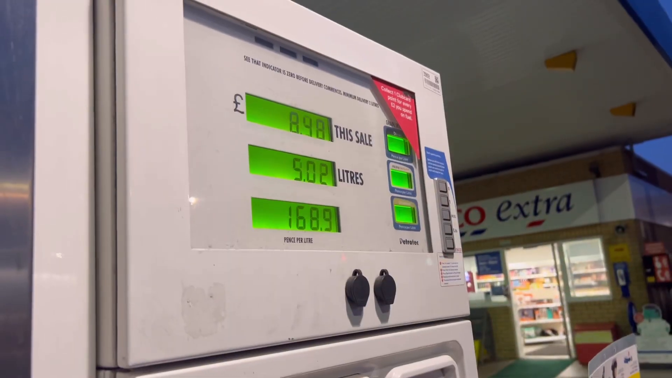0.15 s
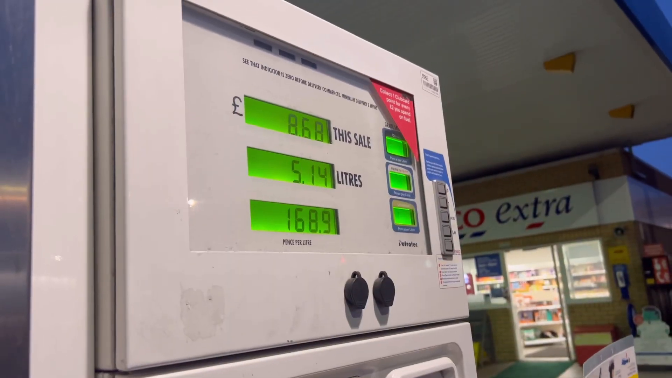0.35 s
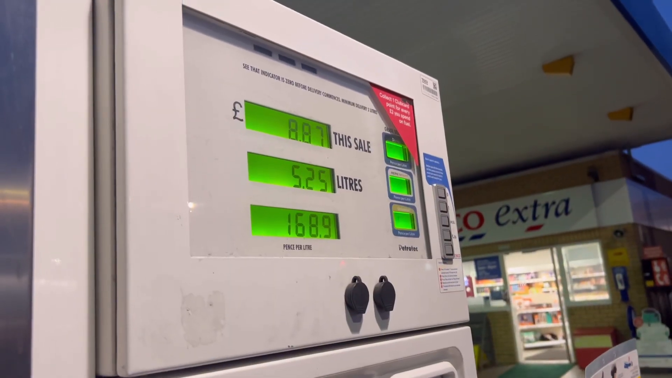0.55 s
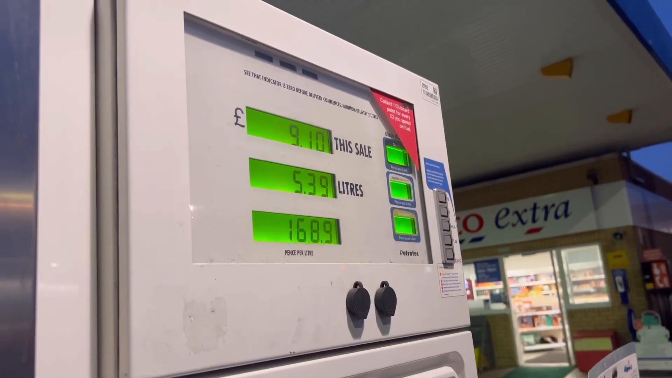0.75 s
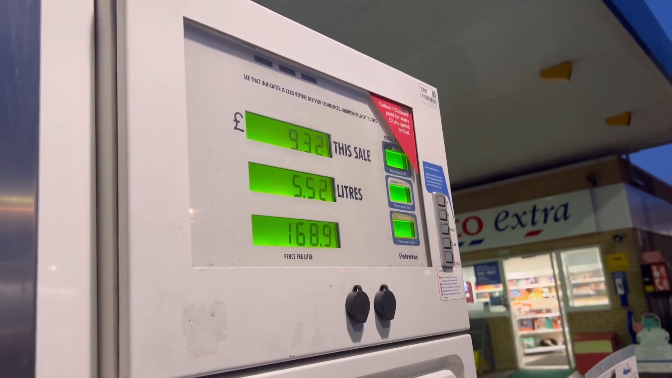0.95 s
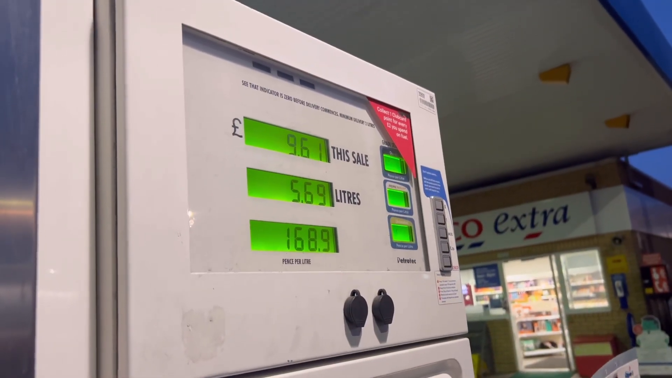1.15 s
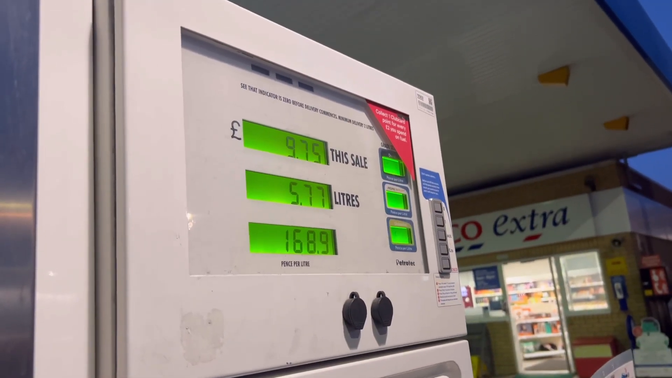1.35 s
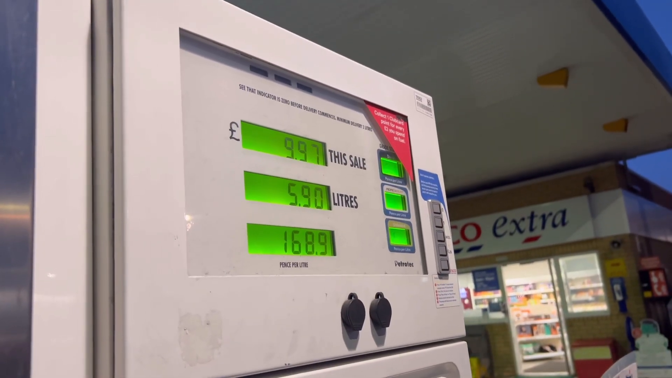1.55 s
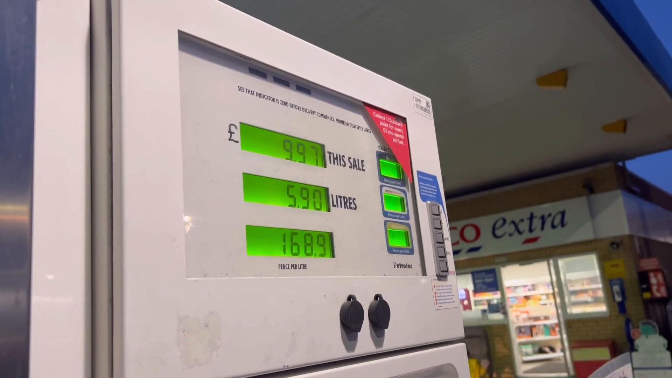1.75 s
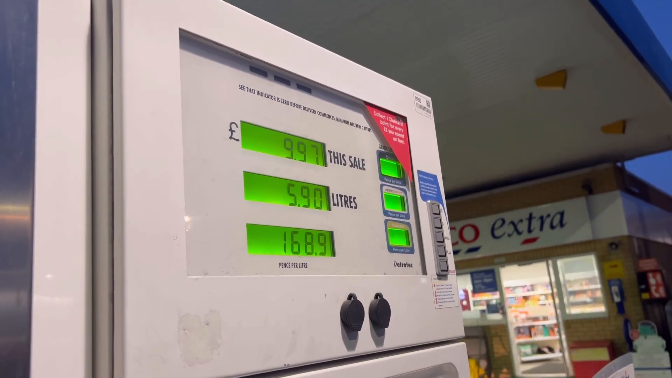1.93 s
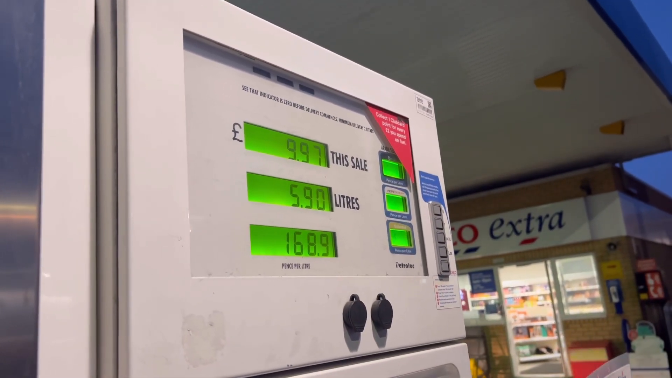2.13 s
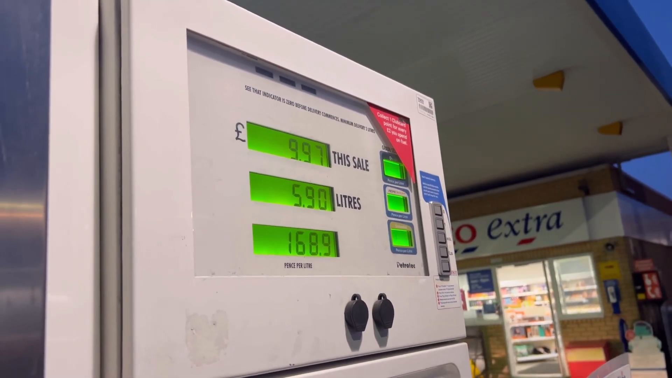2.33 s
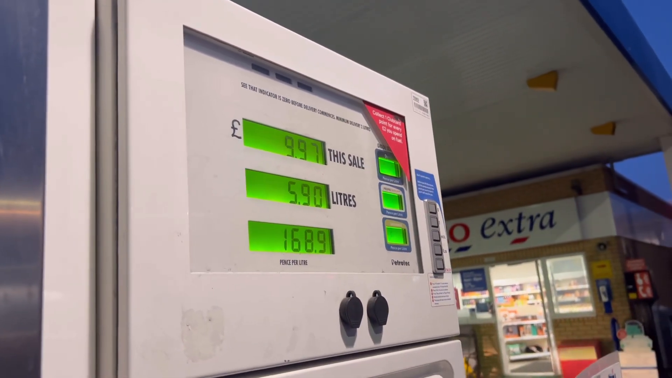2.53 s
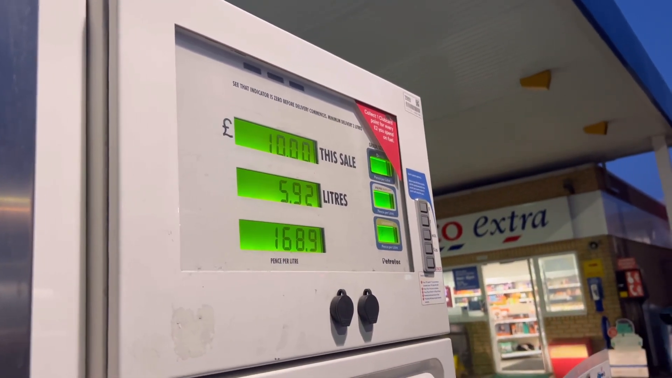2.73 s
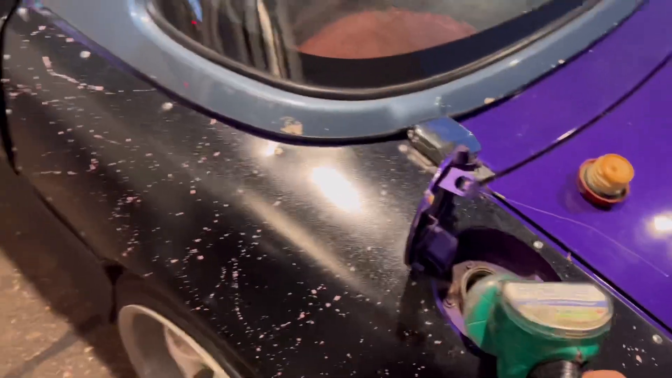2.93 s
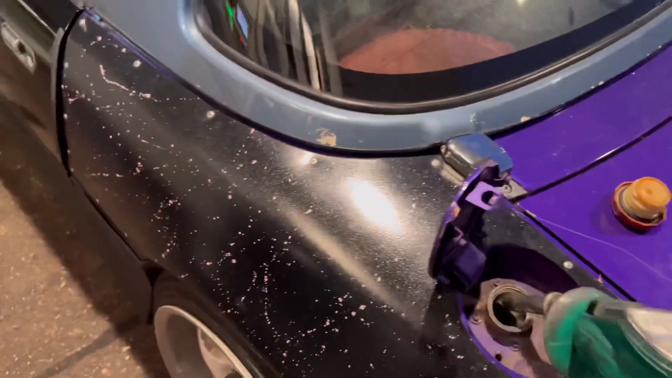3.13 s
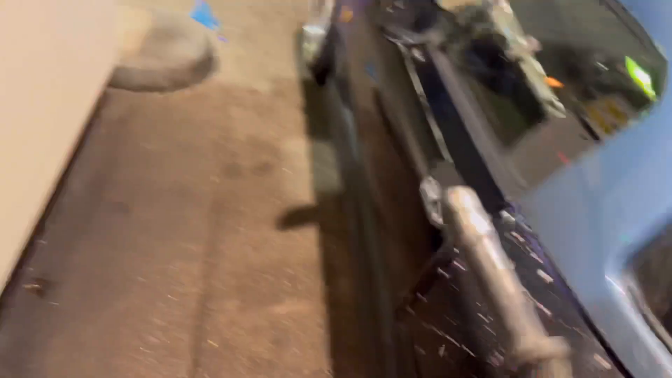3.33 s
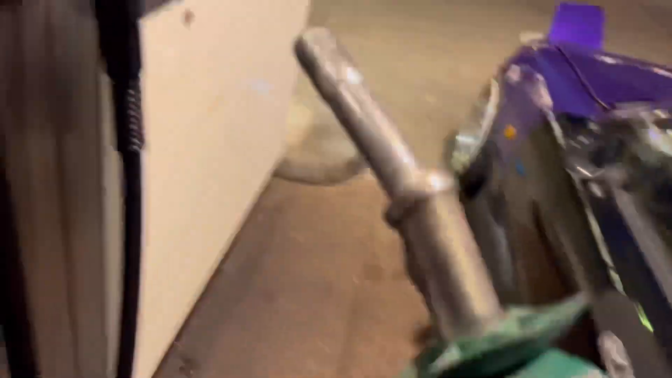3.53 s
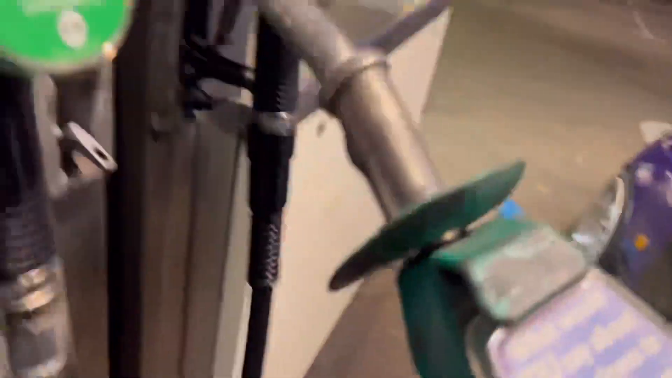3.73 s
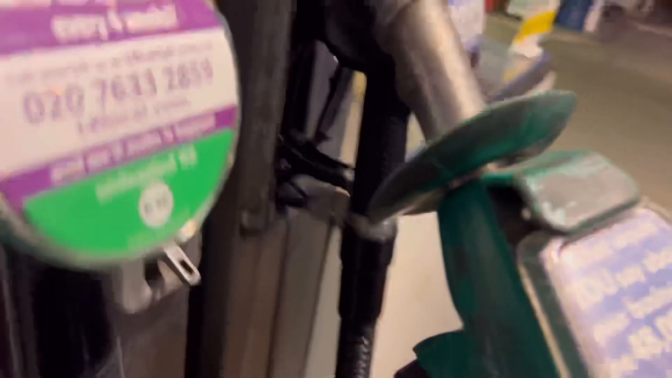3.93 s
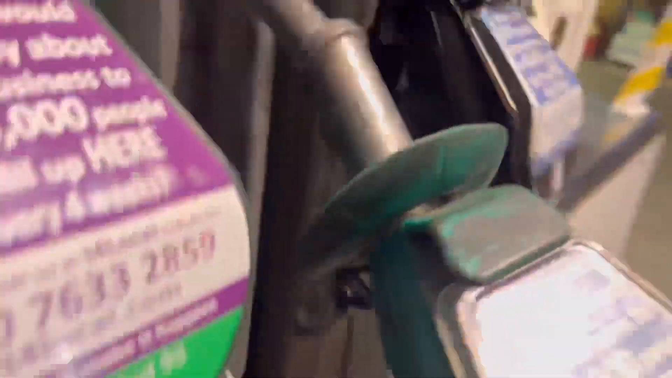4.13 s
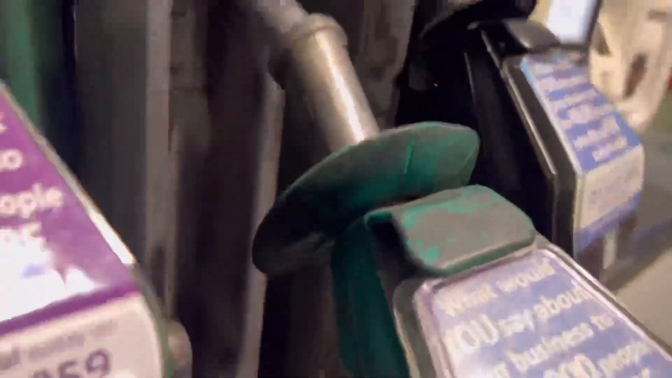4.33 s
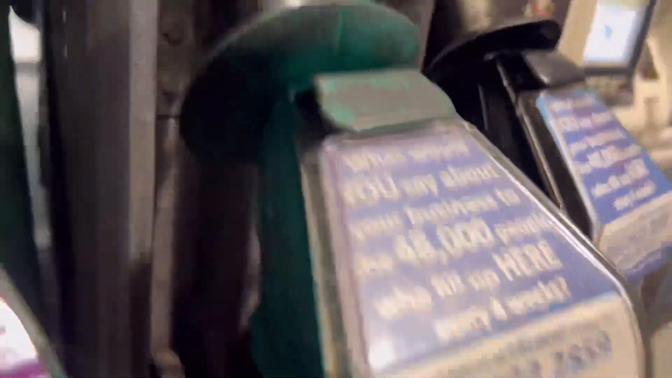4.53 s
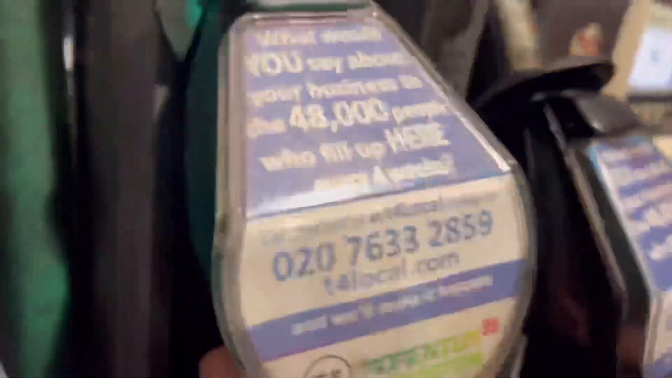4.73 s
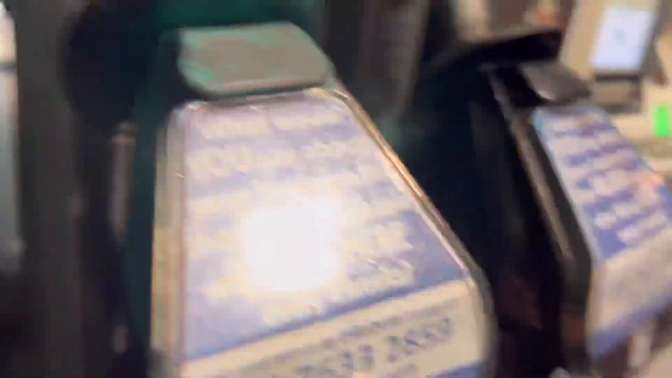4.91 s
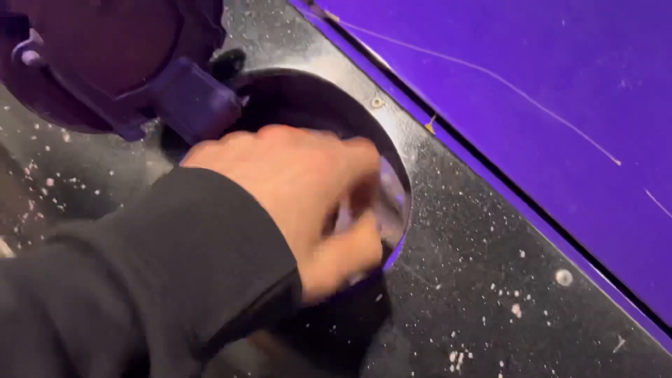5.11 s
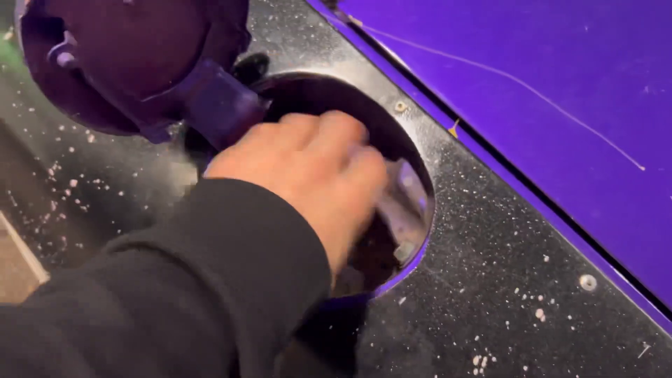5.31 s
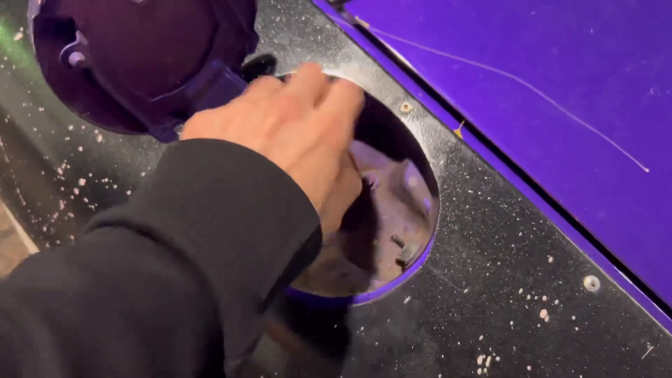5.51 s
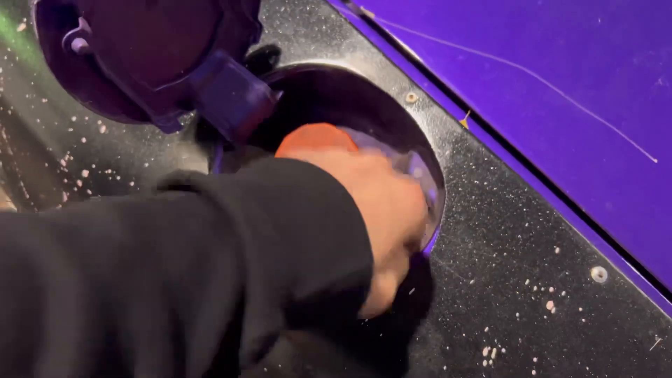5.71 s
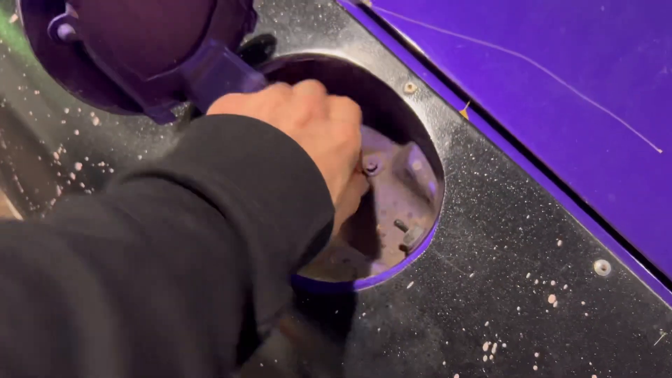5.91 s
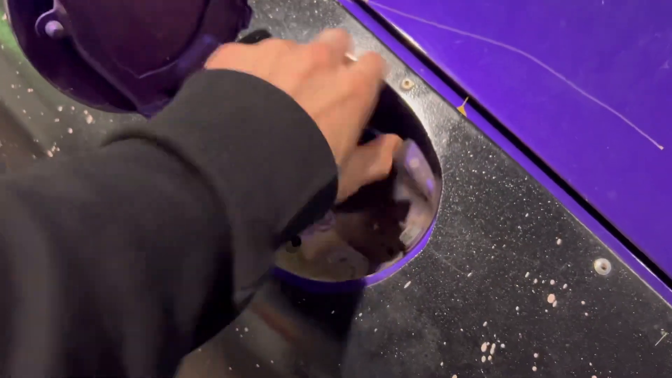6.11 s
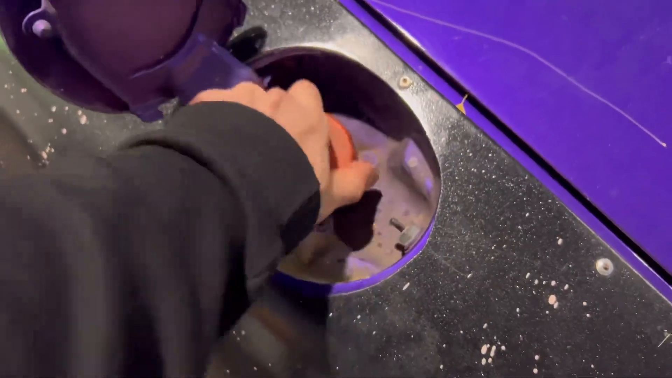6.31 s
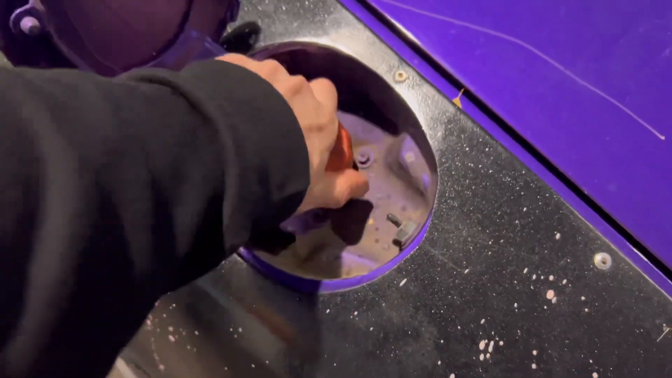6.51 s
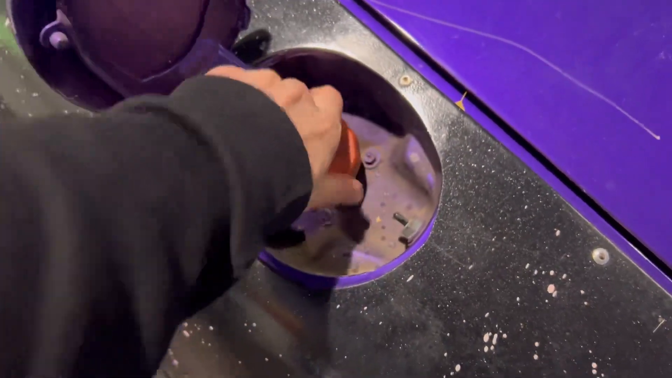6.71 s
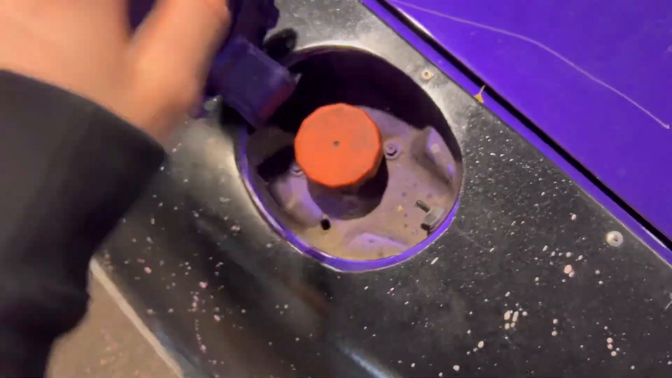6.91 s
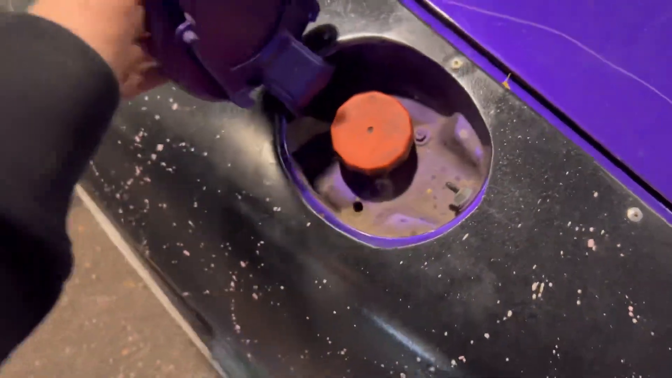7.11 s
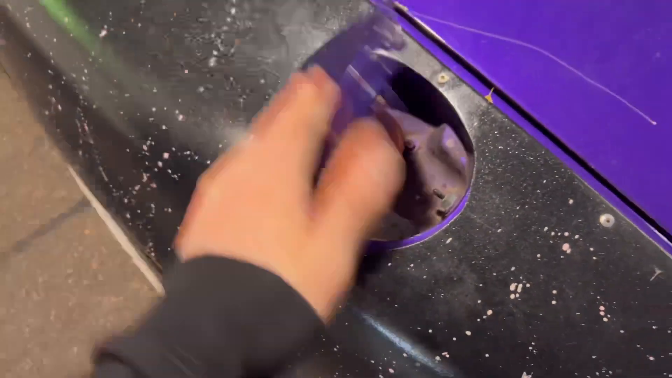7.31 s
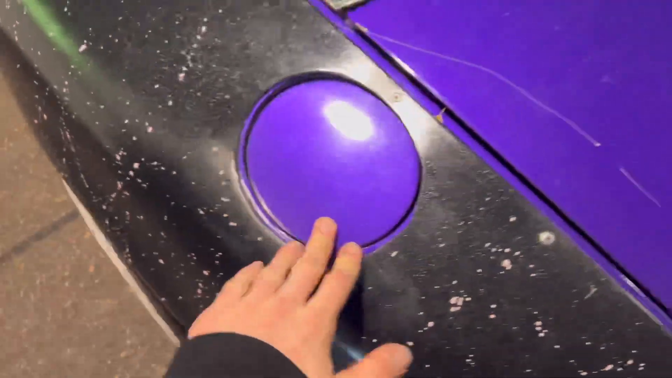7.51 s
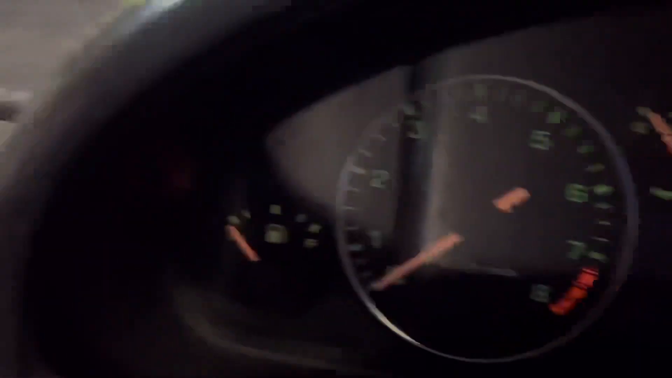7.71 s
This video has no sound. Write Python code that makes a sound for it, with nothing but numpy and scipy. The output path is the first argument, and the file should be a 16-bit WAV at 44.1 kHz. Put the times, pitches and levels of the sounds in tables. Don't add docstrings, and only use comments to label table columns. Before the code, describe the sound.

A fuel pump hums and rushes, a metal nozzle clanks and rattles into its holster, then a plastic cap clicks and a flap slams.

```python
import sys
import numpy as np
from scipy import signal
from scipy.fft import rfft, irfft, next_fast_len
from scipy.io import wavfile
from scipy.ndimage import uniform_filter1d, map_coordinates

SR = 44100
rng = np.random.default_rng(int(sys.argv[2]) if len(sys.argv) > 2 else 0)


def master(y):
    cut = np.clip(np.atleast_2d(y).T, -1, 1)
    pcm = np.round(cut * 32767)
    wavfile.write(sys.argv[1], SR, pcm.astype(np.int16))


def nominal_scale(level):
    x = np.asarray(level, float) / 20
    return 10 ** x


N = 342020


def unit(x):
    return x / np.sqrt(np.mean(x ** 2) + 1e-20)


def along(points, hz, col=1):
    rows = np.transpose(points)
    return np.interp(np.log(hz + 1), np.log(rows[0] + 1), rows[col])


def curves(rows, fade_s=0.014):
    s, *cols = np.transpose(rows)
    t = np.arange(N) / SR
    gate = np.clip((t - s[0]) / fade_s + 1, 0, 1) * np.clip((s[-1] - t) / fade_s + 1, 0, 1)
    return [gate * nominal_scale(np.interp(t, s, c)) for c in cols]


def step(s, over_s):
    return np.clip((np.arange(N) / SR - s) / over_s, 0, 1)


def wobble(rate_hz):
    knots = rng.standard_normal(int(N * rate_hz / SR) + 4)
    return map_coordinates(knots, [np.arange(N) * rate_hz / SR])


def add(bus, s, sound):
    part = bus[..., round(s * SR):][..., :sound.shape[-1]]
    part += sound[..., :part.shape[-1]]


def decay(level_db, t, t60):
    return nominal_scale(level_db - 60 * t / t60)


def filtered(x, response):
    m = next_fast_len(N + 8192)
    return irfft(rfft(x, m) * response(np.fft.rfftfreq(m, 1 / SR)), m)[..., :N]


def resonant(x, peaks):
    def lift(f):
        return nominal_scale(sum(db / (1 + (2 * (f - c) / width) ** 2) for c, width, db in peaks))
    return unit(filtered(x, lift))


def rush(tone, lo_hz, hi_hz, patchy_db):
    z = signal.stft(rng.standard_normal((2, N)), nperseg=512)[2]
    field = uniform_filter1d(rng.standard_normal(z.shape[1:]), size=6, axis=0)
    field = uniform_filter1d(field, size=12, axis=1)
    pair = signal.istft(z * nominal_scale(min(patchy_db, 3) * unit(field)), nperseg=512)[1][:, :N]

    def mid_side(f):
        band = nominal_scale(along(tone, f)) / np.sqrt((1 + (lo_hz / (f + 1)) ** 4) * (1 + (f / hi_hz) ** 4))
        angle = np.arccos(np.clip(along(tone, f, col=3), 0, .93)) / 2
        return band * [np.cos(angle), np.sin(angle)]

    def balance(f):
        return nominal_scale(along(tone, f, col=2) * (f > 90) * [[.5], [-.5]])

    mid, side = filtered(pair, mid_side)
    return unit(filtered(np.array([mid + side, mid - side]), balance))


def hum(hz, drift, swell_db):
    phase = 2 * np.pi * np.cumsum(hz * (1 + drift * wobble(9))) / SR
    return np.sqrt(2) * np.sin(phase) * nominal_scale(swell_db * wobble(7))


RIPPLE_HZ, RIPPLE_DB = 30, 2.2


def rippled(x):
    knots = rng.standard_normal(SR // RIPPLE_HZ)

    def ripple(f):
        return nominal_scale(RIPPLE_DB * map_coordinates(knots, [f / RIPPLE_HZ]) * np.clip(f / 1500, 0, 1) ** 2)
    return filtered(x, ripple)


# (time [s], nearness [dB], motor load [dB])
PUMP_RUN = [(0, -26, -4), (0.45, -26, 0.5), (1.15, -25.5, 4), (1.5, -26, 1), (2.2, -27, -8.5),
            (2.6, -26, -1), (2.9, -27.5, -9.5), (3.32, -27.5, -8), (3.45, -25.5, -4.5), (3.9, -24.5, -1),
            (4.15, -25, -8.5), (4.38, -27.5, -27), (4.52, -25, -3), (4.6, -27.5, -27), (4.72, -25, -13),
            (4.81, -31, -3), (4.93, -38, -8)]
# (frequency [Hz], density [dB per Hz], left-right [dB], likeness [0-1])
PUMP_TONE = [(29.6, -12.5, -0.8, 0.98), (55.6, -5, 15, 0.99), (110, -3.5, -3, 0.93), (192, -10, 2.5, 0.72),
             (362, -12, -2, 0.51), (546, -14, 2.5, 0.49), (900, -13, 2, 0.47), (2000, -19, 7, 0.017),
             (2810, -24, 0.5, 0.37), (4000, -30, 10.5, 0.083), (5840, -37.5, 13.5, 0.1),
             (7050, -43, 6, 0.12), (8500, -42, 6.5, 0.052), (14100, -43.5, -1.5, 0.087)]
# (frequency [Hz], width [Hz], level [dB])
CASING = [(423, 7.9, -1), (583, 38, 5), (1453, 47, 6.5), (1774, 65, 5.5), (2020, 60, 3.5), (2360, 190, 2),
          (2924, 84, 8), (3400, 560, -8.5)]
WHINE_HZ = [168, 236, 272, 414.5, 624.5, 916, 1340, 1435, 1472, 1712, 1742, 2009, 2198, 2277, 2319, 2545,
            2580, 2887, 3214, 3342, 3616, 3858, 4170, 4346, 4893]
WHINE_DB = [-45, -43, -45.5, -45.5, -48, -62.5, -51, -49, -49.5, -60, -56, -54, -51, -54.5, -71.5, -52.5,
            -62, -55.5, -72, -62, -57, -67, -64, -61, -63]
SHAFT_HZ, VANE_HZ = 48.1, 252.6
RUMBLE_DB, RUMBLE_LOAD = 0.5, 0.11
HISS_DB, HISS_FADE_DB_PER_S = -5.5, -0.57
THIRD_DB, SECOND_DB, SECOND_LOAD, VANE_DB = -1, -6, 0.25, -6
MOTOR_OFF_S, COAST_S, COAST_DB = 4.55, 0.022, -4
VANE_DROP_S, VANE_RETURN_S, VANE_DROP_DB = 3.36, 3.92, -10.5
BRIGHT_S, BRIGHT_HISS_DB, BRIGHT_FLOW_DB = 2.9, 1.5, -0.7
WHINE_EASE_S, WHINE_EASE_DB = 2.1, -3


def pump():
    flow, load = curves(PUMP_RUN)
    motor = flow * nominal_scale(COAST_DB * step(MOTOR_OFF_S, COAST_S))
    vane_drop_db = VANE_DROP_DB * (step(VANE_DROP_S, 0.022) - 0.5 * step(VANE_RETURN_S, 0.2))
    bright = step(BRIGHT_S, .05) - step(VANE_DROP_S, 0.15)

    rumble_db = RUMBLE_DB - 0.091 * vane_drop_db + 0.99 * wobble(4.76) + 1.3 * wobble(15)
    rumble = motor * load ** RUMBLE_LOAD * nominal_scale(rumble_db)
    hiss = flow * nominal_scale(HISS_DB + HISS_FADE_DB_PER_S * np.arange(N) / SR + BRIGHT_HISS_DB * bright)
    casing = resonant(rush(PUMP_TONE, lo_hz=279, hi_hz=3780, patchy_db=1.2), CASING)
    x = rumble * rush(PUMP_TONE, lo_hz=22, hi_hz=290, patchy_db=1.0)
    x += flow * nominal_scale(BRIGHT_FLOW_DB * bright) * rippled(casing)
    x += hiss * rippled(rush(PUMP_TONE, lo_hz=3860, hi_hz=20300, patchy_db=1.0))

    third = np.sqrt(flow * motor) * load * nominal_scale(THIRD_DB + 0.41 * vane_drop_db)
    second = motor * load ** SECOND_LOAD * nominal_scale(SECOND_DB)
    x += third * hum(3 * SHAFT_HZ, drift=0.006, swell_db=2)
    x += second * hum(2 * SHAFT_HZ, drift=0.006, swell_db=1.8)
    x += motor * nominal_scale(VANE_DB + vane_drop_db) * hum(VANE_HZ, drift=0.004, swell_db=1.6)
    ease_db = WHINE_EASE_DB * step(WHINE_EASE_S, 0.45)
    whine = np.zeros(N)
    for hz, db in zip(WHINE_HZ, WHINE_DB):
        whine += nominal_scale(db + ease_db * (hz < 1000)) * hum(hz, drift=0.0015, swell_db=3)
    return x + motor * nominal_scale(30.0) * whine * nominal_scale([[1.5], [-1.5]])


RISE_S = .0011
SNAP_DB, SNAP_S = 5.5, 0.0078


def contacts(table, tone, body, lean_db, edge_life):
    clack, edge, knock = np.zeros(N), np.zeros(N), np.zeros((2, N))
    t = np.arange(SR // 5) / SR
    rise = 1 - np.exp(-(t / RISE_S) ** 2)
    mode_hz, width, mode_db = np.transpose(body)[:, :, None, None]
    low = mode_hz[:, 0, 0] < 8000
    for s, clack_db, edge_db, hz, knock_db, t60 in table:
        add(clack, s, rise * decay(clack_db - 4.5, t, t60) + rise ** .6 * decay(clack_db - 2, t, SNAP_S))
        add(edge, s, rise ** 3 * decay(edge_db - 4.5, t, edge_life * t60))
        add(edge, s, rise * decay(edge_db + SNAP_DB, t, SNAP_S))
        luck = rng.standard_normal((3, len(body), 2, 1))
        pitch = mode_hz + 0.38 * width * luck[1]
        modes = decay(mode_db + 1.4 * luck[0], t, 250e3 / mode_hz) * np.sin(2 * np.pi * pitch * t + luck[2])
        add(knock, s, rise * decay(clack_db - 22, t, 0.76 * t60) * modes[low].sum(axis=0))
        cluster = hz * (1 + 0.036 * np.array([-1, 0, .8]))[:, None, None]
        ring = np.sin(2 * np.pi * cluster * t + .6 * luck[2, 0]) * [[[.5]], [[1.5]], [[.6]]]
        add(knock, s, rise * decay(knock_db - 6, t, .8 * t60) * ring.sum(axis=0))
    clack = clack * resonant(rush(tone, lo_hz=416, hi_hz=6500, patchy_db=-6.0), body)
    edge = edge * resonant(rush(tone, lo_hz=9450, hi_hz=20400, patchy_db=1.0), body)
    return clack + edge + knock * nominal_scale([[lean_db], [-lean_db]])


def with_t60(rows, least_s, cycles):
    return [(*row, least_s + cycles / row[3]) for row in rows]


# (time [s], clack [dB], edge [dB], knock [Hz], knock level [dB])
NECK = [(1.085, -45, -22, 2000, -41), (2.8164, -34, -23, 4000, -45), (2.982, -34, -46, 1180, -18),
        (2.9876, -27, -56, 1650, -15), (3.0094, -18, -50, 1720, -18), (3.025, -21, -23, 4400, -13),
        (3.0265, -25, -40, 2850, -17), (3.029, -22, -40, 1410, -21), (3.109, -18, -43, 5100, -15),
        (3.113, -32, -43, 4300, -15), (3.1255, -15, -27, 5070, -8), (3.127, -32, -40, 4320, -15),
        (3.1265, -30, -40, 2820, -17), (3.1425, -32, -40, 1760, -12.5), (3.146, -31, -37, 2810, -15),
        (3.1418, -12, -10, 4880, 1.5)]
# (time [s], clack [dB], edge [dB], knock [Hz], knock level [dB])
HOLSTER = [(3.806, -26, -45, 1450, -17), (3.8144, -29, -23, 1050, -15), (4.2103, -17, -25, 2020, -13),
           (4.2108, -30, -42, 4670, -16), (4.2112, -30, -41, 3000, -23), (4.214, -26, -42, 2070, -9),
           (4.221, -31, -44, 1184, -16), (4.2602, -32, -37, 2070, -10), (4.262, -38, -48, 1410, -15),
           (4.295, -26, -42, 990, -19), (4.8385, -11, -35, 2520, -26), (4.8432, -28, -38, 1880, -20),
           (4.8455, -30, -34, 876, -15), (4.846, -22, -32, 4800, -13), (4.862, -24, -38, 2460, -21),
           (4.863, -30, -38, 3400, -15), (4.876, -28, -26, 877, -17), (4.2572, -6, -23, 4680, -15),
           (4.2572, -27, -47, 1945, -17), (4.272, -36, -46, 1160, -13), (4.286, -33, -44, 1270, -18),
           (4.477, -42, -65, 973, -15.5), (4.5466, -17, -16, 1870, -8), (4.5965, -35, -25, 2350, -26),
           (4.8258, -15, -24, 2170, -15), (4.8405, -34, -27, 6050, -8), (4.8594, -27, -29, 1110, -15)]
# (time [s], clack [dB], edge [dB], knock [Hz], knock level [dB])
LEVER = [
    (3.0844, -22, -31, 8700, -44),
    (3.816, -40, -40, 8500, -31),
    (3.8284, -40, -26, 8500, -24),
    (3.846, -42, -25, 8500, -30),
    (3.8794, -31, -24, 7660, -30),
    (3.9074, -39, -27, 7700, -34),
    (4.4556, -15.5, -11, 4280, -26),
    (4.4615, -42, -37, 8200, -32),
    (4.5945, -40, -37, 8500, -37),
]
# (time [s], clack [dB], edge [dB], knock [Hz], knock level [dB])
CHATTER = [(4.6015, -24, -28, 2340, -10), (4.6145, -19, -14, 4730, -7.5), (4.6152, -15, -30, 2000, -5),
           (4.6292, -15, -15, 2400, -8), (4.6365, -7, -5, 2420, -8), (4.6452, -7, -22, 3640, -7),
           (4.6686, -5, -15, 2500, -28), (4.6918, 0, -20, 3500, -9), (4.7074, -14, -22, 900, -20),
           (4.7225, -18, -22, 2440, -16), (4.7344, -13, -28, 915, -13), (4.589, -31, -38, 2500, -14),
           (4.603, -30, -38, 4830, -28), (4.6535, -20, -28, 2480, -13), (4.6585, -10, -26, 4240, -12),
           (4.674, -25, -34, 1130, -16), (4.6925, -35, -34, 1140, -8.5), (4.7045, -21, -20, 760, -32),
           (4.7155, -7, -34, 2340, -17), (4.747, -27, -20, 2770, -34), (4.7515, -30, -30, 930, -15),
           (4.761, -30, -39, 2180, -24), (4.8428, -16, -13, 2620, -9), (4.8436, -16, -30, 3210, -7),
           (4.8465, -25, -28, 2900, -7.5)]
# (frequency [Hz], density [dB per Hz], left-right [dB], likeness [0-1])
HOLSTER_TONE = [(60, -10.2, 0.0, 0.96), (110, 0.0, 0.6, 0.99), (190, -4.8, 1.3, 0.93),
                (330, -8.0, 0.9, 0.93), (550, -6.7, 1.5, 0.83), (900, -5.1, 7.9, 0.69),
                (1300, -4.5, 2.3, 0.51), (2000, -4.4, 10.5, 0.32), (3000, -10.1, 4.2, 0.09),
                (4500, -14.9, 4.3, 0.24), (6200, -19.5, 7.5, 0.26), (8500, -19.9, 3.9, 0.15),
                (10500, -20.5, -0.1, 0.69), (14500, -25.5, -0.7, 0.81)]
# (frequency [Hz], width [Hz], level [dB])
SPOUT = [(915, 63, 6), (1490, 550, 1.5), (2190, 57, -19), (2505, 100, 10), (3050, 650, 0), (4670, 200, -2),
         (6050, 180, -3), (8500, 140, 9), (12500, 7700, 13)]


def nozzle():
    steel = with_t60(NECK, 0.008, 48) + with_t60(HOLSTER, 0.01, 78)
    steel += with_t60(LEVER, 0.14, 37) + with_t60(CHATTER, 0.016, 30)
    return contacts(steel, HOLSTER_TONE, SPOUT, lean_db=4.5, edge_life=0.67)


# (time [s], level [dB])
SLIDE = [
    (4.54, -45),
    (4.55, -16),
    (4.61, -24),
    (4.652, -9.5),
    (4.677, -13),
    (4.689, -24),
    (4.698, -11.5),
    (4.728, -10.5),
    (4.8, -54),
]


def rattle():
    body, = curves(SLIDE, fade_s=0.0092)
    edge = body ** 2.45
    chatter = unit(nominal_scale(5 * np.tanh(wobble(260)) + 1.2 * wobble(90)))
    low = resonant(rush(HOLSTER_TONE, lo_hz=150, hi_hz=6500, patchy_db=10.0), SPOUT)
    high = resonant(rush(HOLSTER_TONE, lo_hz=7100, hi_hz=20000, patchy_db=7.0), SPOUT)
    return chatter * (body * nominal_scale(-5.5) * low + edge * nominal_scale(0.5) * high)


# (time [s], peak [dB])
CRACKS = [(4.2103, -9), (4.2575, -19), (4.4555, -13), (4.5468, -16), (4.6155, -5), (4.6295, -9),
          (4.637, -10), (4.646, -8), (4.67, -9), (4.6925, -11), (4.6938, -13), (4.7074, -7), (4.712, -15),
          (4.7165, -12), (4.727, -17), (4.653, -12), (4.659, -1), (4.84, -16), (4.845, -7), (4.2593, -17),
          (4.723, -10), (4.7348, -20), (4.8433, -4), (4.847, -6), (5.36, -24), (5.445, -25), (5.4615, -24),
          (5.58, -25), (5.653, -25), (5.656, -25), (5.366, -26), (5.583, -28)]
CRACK_HZ, CRACK_T60_S = 3600, .005


def cracks():
    x, t = np.zeros((2, N)), np.arange(SR // 50) / SR
    luck = rng.standard_normal((len(CRACKS), 2, len(t)))
    for (s, db), spit in zip(CRACKS, luck):
        hz = CRACK_HZ * nominal_scale(1.5 * spit[0, 0]) * (.5 if s > 5 else 1)
        cycle = 2 * np.sin(2 * np.pi * hz * t) * nominal_scale(-30 * hz * t)
        add(x, s, nominal_scale(db) * (cycle + 0.35 * spit * decay(0, t, CRACK_T60_S)))
    x = filtered(x, lambda f: 1 / np.sqrt((1 + (600 / (f + 1)) ** 4) * (1 + (f / 9000) ** 2)))
    return x * nominal_scale([[2.5], [-2.5]])


# (time [s], frequency [Hz], level [dB], t60 [s])
THUDS = [(3.411, 110, -16, 0.073), (3.516, 138, -10, 0.085), (3.69, 110, -12, 0.18),
         (3.805, 200, -23, 0.072), (3.856, 150, -11.5, 0.12), (3.865, 72.3, -8, 0.11),
         (4.07, 132, -13.5, 0.077), (3.815, 326, -16, .06), (3.843, 423, -15, 0.085),
         (3.876, 202, -17, 0.082), (3.702, 375, -36, 0.069), (4.671, 245, -18, 0.054),
         (4.685, 148, -9.5, 0.071), (4.705, 150, -14, 0.12), (4.867, 150, -19, 0.15),
         (4.848, 150, -30, 0.22), (5.362, 168, -25, 0.08), (5.46, 255, -25.5, 0.13),
         (6.895, 89, -16.5, 0.084), (6.94, 102, -17, 0.073), (6.984, 120, -21, 0.07),
         (7.048, 110, -22, 0.075), (7.669, 51.5, -22, 0.7)]


def thuds():
    x, t = np.zeros(N), np.arange(SR // 3) / SR
    for s, hz, db, t60 in THUDS:
        add(x, s, decay(db, t, t60) * (1 - np.exp(-t / 0.00075)) * np.sin(2 * np.pi * hz * t))
    return x


# (time [s], clack [dB], edge [dB], knock
# [Hz], knock level [dB])
CAP = [(5.3608, -11.5, -36, 1310, -11), (5.42, -32, -31, 920, -23), (5.442, -17.5, -34, 710, -32),
       (5.46, -20, -38, 1280, -15), (5.577, -10.5, -26.5, 1280, -20), (5.623, -36, -55, 855, -20),
       (5.6496, -14, -27.5, 1150, -21), (5.655, -34, -48, 760, -21), (5.9, -24, -34, 6900, -32),
       (5.955, -40, -35.5, 900, -42), (6.11, -45, -51, 900, -48), (6.204, -22, -40, 900, -40),
       (7.011, -42, -24, 6500, -45), (7.357, -30, -35, 3700, -25), (7.387, -23, -42, 3020, -20),
       (7.395, -44, -44, 3300, -30), (5.36, -35, -40, 3840, -40), (5.378, -25, -50, 1350, -27),
       (5.388, -28, -50, 1450, -30), (5.366, -22, -45, 1300, -20), (5.464, -26, -45, 1300, -22),
       (5.584, -24, -45, 1200, -24), (5.472, -43, -48, 2400, -40), (5.657, -38, -38, 3500, -35)]
# (frequency [Hz], density [dB per Hz], left-right [dB], likeness [0-1])
STREET_TONE = [(30, -4, -0.3, 0.98), (57.4, 5.5, -3, 0.95), (110, -0.5, -1.5, 0.94), (324, -10, -2.5, 0.89),
               (530, -15, 1, 0.94), (900, -14.5, 0.5, 0.23), (1160, -12, 0, 0.14),
               (2000, -23.5, -2.5, 0.48), (3020, -28.5, -3, 0.04), (4420, -30.5, 0, 0.12),
               (6360, -38.5, 6.5, 0.092), (7300, -43, -1, 0.08), (8500, -41, 3, 0.06),
               (14000, -54, 13.5, 0.41)]


def cap():
    body = [(760, 210, 4), (1280, 350, 7.5), (3800, 150, -10)]  # (Hz, width Hz, dB)
    return contacts(with_t60(CAP, 0.02, 9), STREET_TONE, body, lean_db=4.0, edge_life=0.53)


# (time [s], ring [dB], crack [dB], extra bass [dB], time until the seat stifles the ring [s])
FLAP = [
    (7.3685, -8, -15, -6, .0088),
    (7.3862, -7.5, -31, 6, .2),
    (7.3999, -21, -40, 10, .03),
]
# (frequency [Hz], level [dB], t60 [s])
PANEL = [(236, -19, 0.24), (325, -14, 0.12), (436, -14, 0.14), (546, -13, .25), (619, -5, 0.28),
         (759, -12, .09), (985, -1.5, 0.024), (1217, -20, .1), (1378, -24, 0.07), (1750, -17, 0.025)]
SEAT_HZ, SEAT_DB, SEAT_T60_S, SEAT_RISE_S = 545, 4, .042, .0028


def flap():
    x, t = np.zeros((2, N)), np.arange(SR // 2) / SR
    grit = rush(HOLSTER_TONE, lo_hz=4100, hi_hz=7000, patchy_db=5)
    grit += 1.15 * rush(HOLSTER_TONE, lo_hz=10200, hi_hz=20000, patchy_db=7)
    boom = rush(HOLSTER_TONE, lo_hz=170, hi_hz=520, patchy_db=2)
    for s, ring_db, crack_db, bass_db, free_s in FLAP:
        ring = np.zeros(len(t))
        for hz, db, t60 in PANEL:
            tilt = np.sign(round(np.log2(580 / hz)))
            ring += decay(db + bass_db * tilt, t, t60) * np.sin(2 * np.pi * hz * t)
        seat = (1 - np.exp(-(t / SEAT_RISE_S) ** 2)) * decay(SEAT_DB - .75 * bass_db, t, SEAT_T60_S)
        ring += seat * np.sin(2 * np.pi * SEAT_HZ * t)
        ring *= .2 + .8 * np.exp(-(t / free_s) ** 6)
        cut = slice(round(s * SR / 2), round(s * SR / 2) + len(t))
        crack = (1 - np.exp(-(t / 0.0017) ** 2)) * decay(crack_db + 3, t, 0.026) * grit[:, cut]
        body = decay(ring_db + bass_db - 16, t, 0.088) * boom[:, cut]
        blow = nominal_scale(ring_db) * ring * nominal_scale([[1.7], [-1.7]]) + crack + body
        add(x, s, (1 - np.exp(-t / 0.0009)) * blow)
    return x


# (frequency [Hz], t60 [s])
CANOPY = [(200, 0.23), (2000, 0.14), (10000, 0.056)]


def canopy(x):
    hz, t, z = signal.stft(rng.standard_normal((2, SR // 2)), SR, nperseg=256)
    tail = signal.istft(z * decay(0, t, along(CANOPY, hz)[:, None]), SR, nperseg=256)[1]
    late = np.pad(x, ((0, 0), (300, 0)))
    return signal.fftconvolve(late, tail / np.linalg.norm(tail[0]), axes=1)[:, :N]


# (time [s], level [dB])
STREET = [
    (4.85, -30.5),
    (5.16, -32.5),
    (5.8, -32),
    (6.55, -33),
    (6.92, -32),
    (7.3, -32.5),
    (7.75, -36),
]
ENGINES_DB, AIR_DB = -2.5, -12.5
LORRY_S, LORRY_LONG_S, LORRY_DB = 7.7, .2, 0.5
DUCK_S, DUCK_DB, RECOVER_S = 7.43, -8.5, .1


def street():
    level, = curves(STREET)
    duck_db = DUCK_DB * (step(DUCK_S, .05) - step(DUCK_S + .08, RECOVER_S))
    swell_db = LORRY_DB * np.exp(-((np.arange(N) / SR - LORRY_S) / LORRY_LONG_S) ** 2)
    engines = nominal_scale(ENGINES_DB + swell_db + 0.35 * duck_db + 0.44 * wobble(37))
    air = nominal_scale(AIR_DB + duck_db + 1.5 * wobble(2.53))
    x = engines * rush(STREET_TONE, lo_hz=20, hi_hz=219, patchy_db=-0.5)
    x += nominal_scale(duck_db) * rush(STREET_TONE, lo_hz=223, hi_hz=3330, patchy_db=1.5)
    x += air * rush(STREET_TONE, lo_hz=3500, hi_hz=20000, patchy_db=1.5)
    return level * x


ECHO_STEP_DB, ECHO_STEP_S = -9, 3.4
FLAP_ECHO_DB = -7


def scene():
    hits = nozzle() + rattle() + cracks() + cap()
    slam = flap()
    echo_step = nominal_scale(ECHO_STEP_DB * (0.5 - step(ECHO_STEP_S, .1)))
    echo = nominal_scale(-12.0) * canopy(hits * echo_step + nominal_scale(FLAP_ECHO_DB) * slam)
    return pump() + hits + thuds() + slam + echo + street()


def top_cut(x):
    return signal.sosfilt(signal.butter(12, 16200, fs=SR, output="sos"), x)


# (frequency [Hz], lead [rad])
TURN = [(0, -.05), (150, -.22), (350, -.5), (550, -1.2), (800, -1.8), (1600, -2.4), (2600, -1.2),
        (8500, -1.2), (9400, -3.5), (10500, -3.14), (12900, -.15), (13900, .15), (15800, 2.6)]
# (frequency [Hz], level [dB])
MIC = [(7000, 0), (7650, -3), (8100, 0), (9300, 0), (10200, -6), (11200, -4), (12500, -4), (15600, -2),
       (15900, -40), (16300, -90)]
ONE_PORT_HZ = 9650
APART_DB = -39


def record(dry):
    left, right = dry
    shared = filtered(left - right, lambda f: .8 / (1 + (ONE_PORT_HZ / (f + 1)) ** 40))
    treble = np.abs(uniform_filter1d(filtered(left, lambda f: f > ONE_PORT_HZ) ** 2, size=512))
    shared = shared / (1 + (treble / nominal_scale(2 * APART_DB)) ** 2)
    right = filtered(right + shared, lambda f: np.exp(1j * np.interp(f, *np.transpose(TURN))))
    x = filtered(np.array([left, right]), lambda f: nominal_scale(along(MIC, f)) / (1 + (39 / (f + 1)) ** 4))
    x = x / (1 + np.abs(x / .98) ** 6) ** (1 / 6)
    x = filtered(x, lambda f: f < 16350)
    return top_cut(x)


dry = scene()
out = record(dry)
master(out)
```